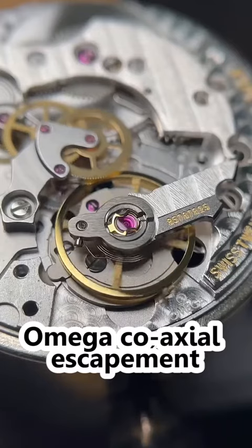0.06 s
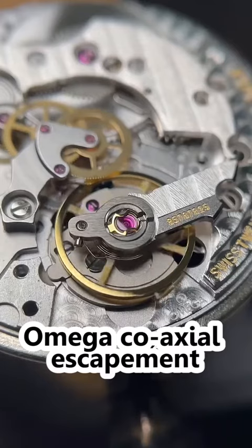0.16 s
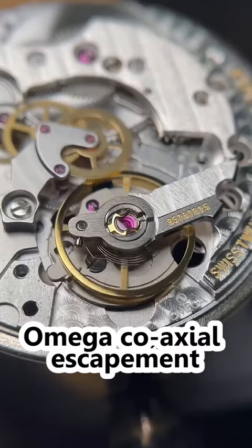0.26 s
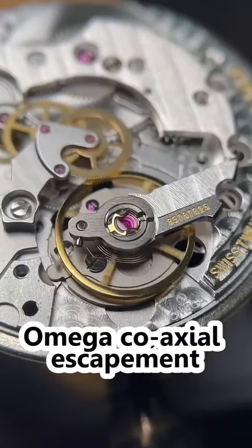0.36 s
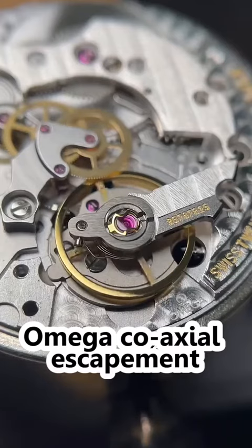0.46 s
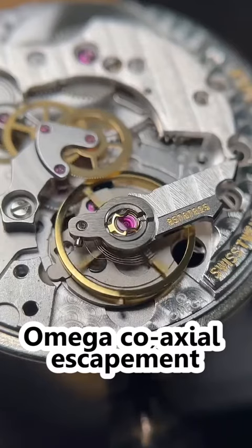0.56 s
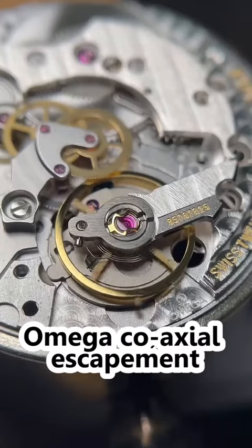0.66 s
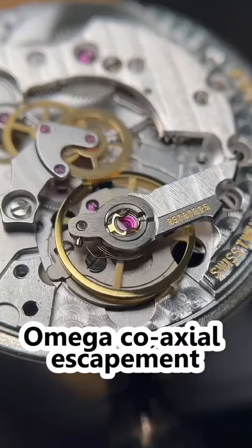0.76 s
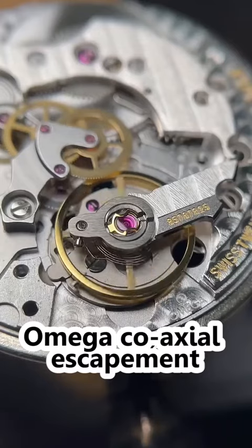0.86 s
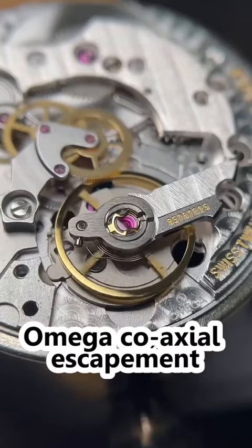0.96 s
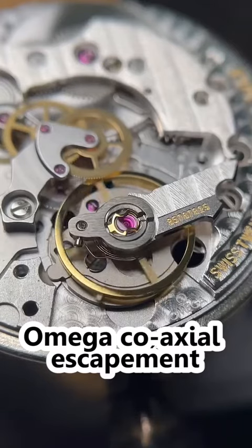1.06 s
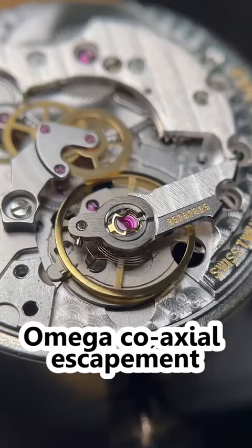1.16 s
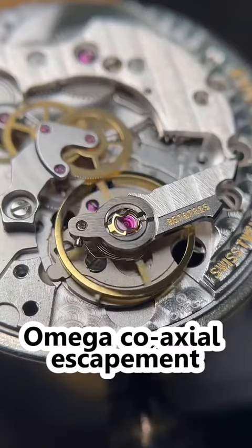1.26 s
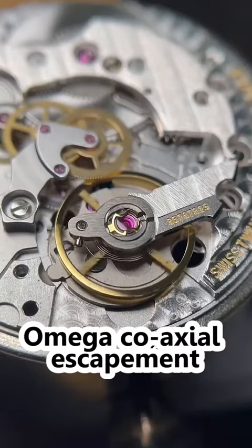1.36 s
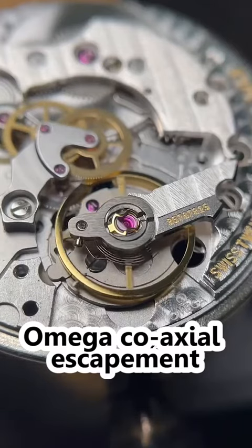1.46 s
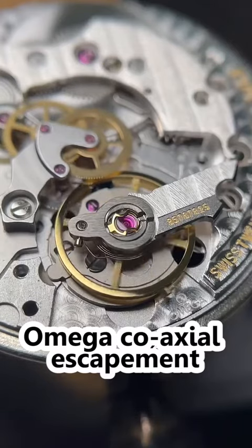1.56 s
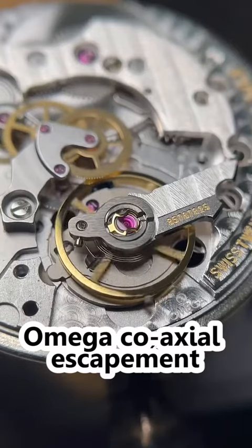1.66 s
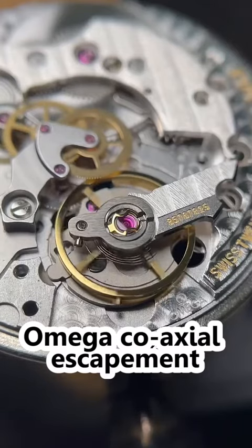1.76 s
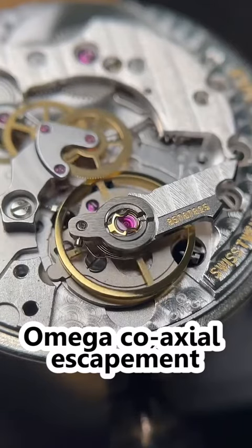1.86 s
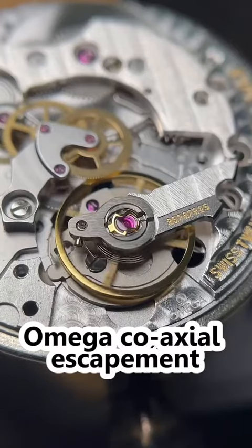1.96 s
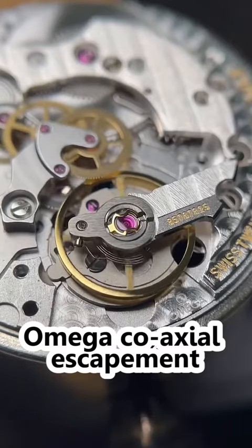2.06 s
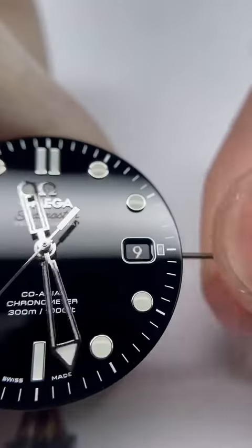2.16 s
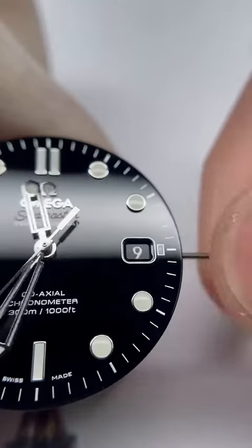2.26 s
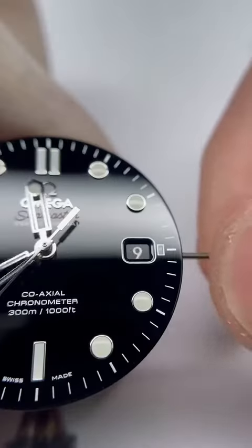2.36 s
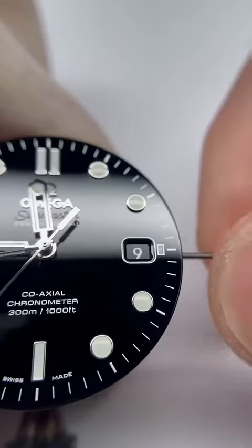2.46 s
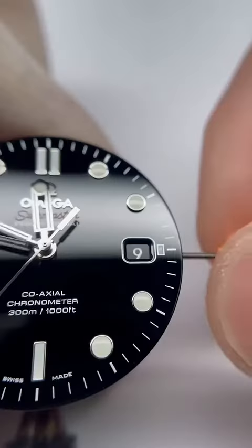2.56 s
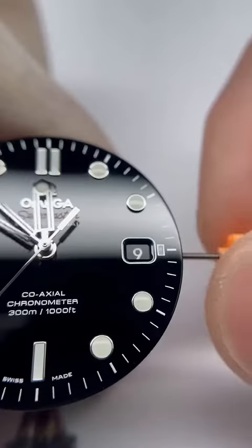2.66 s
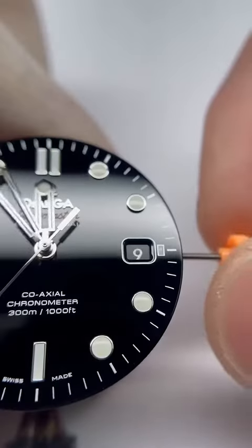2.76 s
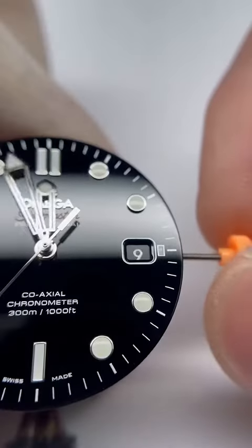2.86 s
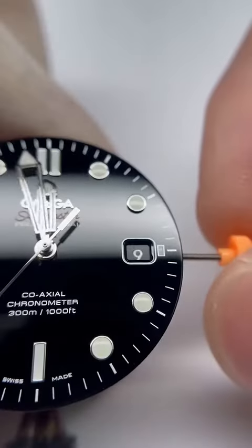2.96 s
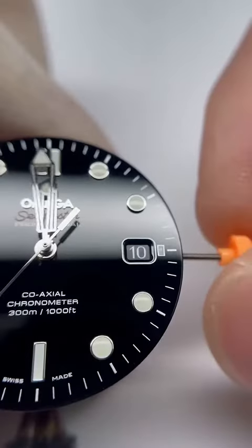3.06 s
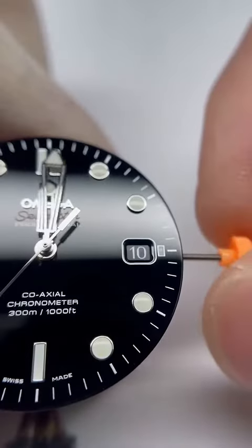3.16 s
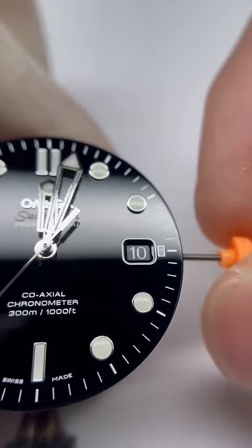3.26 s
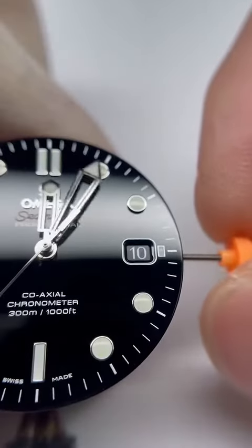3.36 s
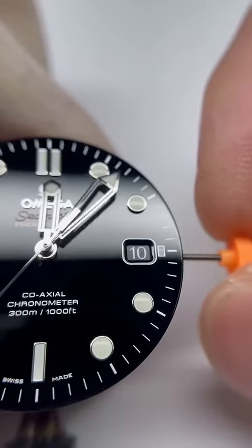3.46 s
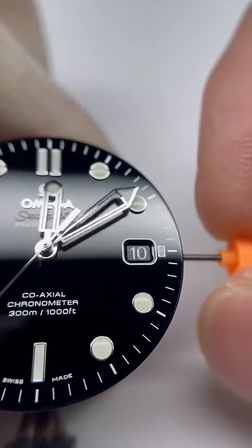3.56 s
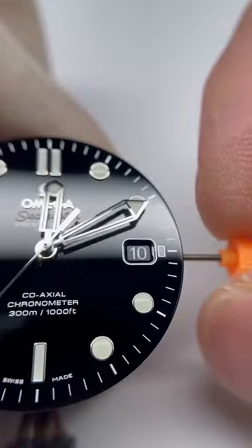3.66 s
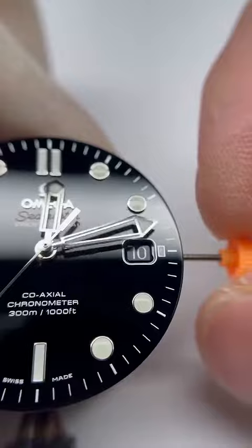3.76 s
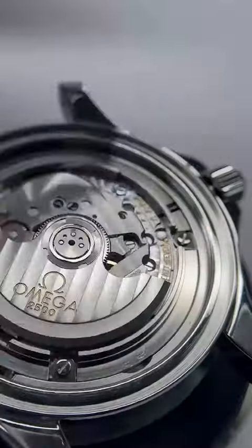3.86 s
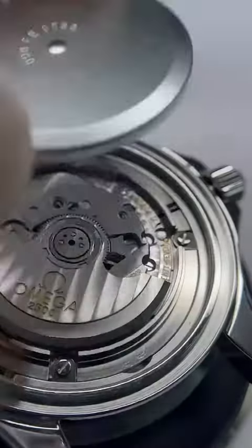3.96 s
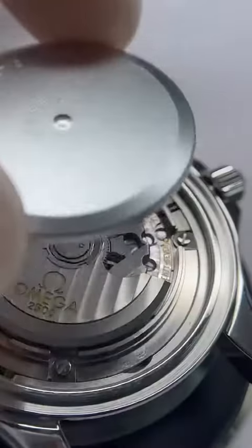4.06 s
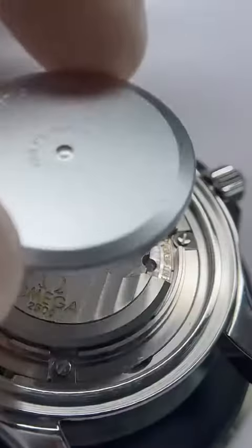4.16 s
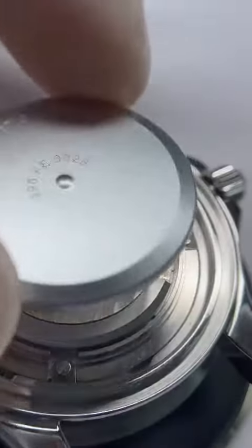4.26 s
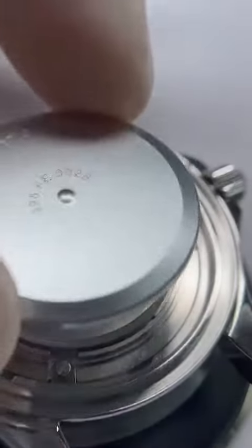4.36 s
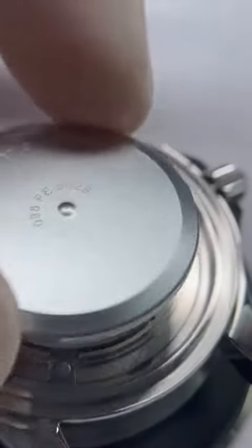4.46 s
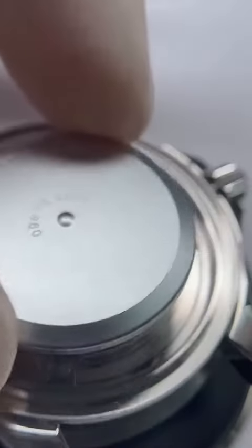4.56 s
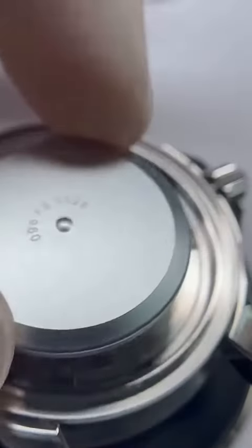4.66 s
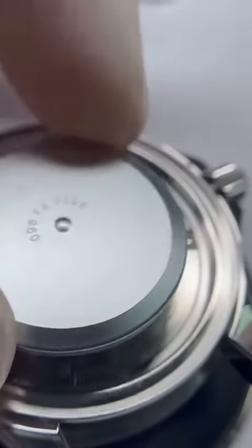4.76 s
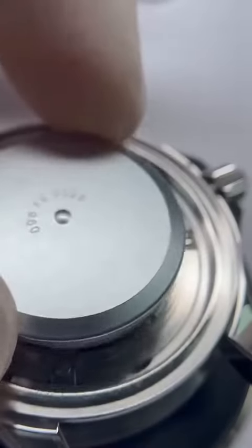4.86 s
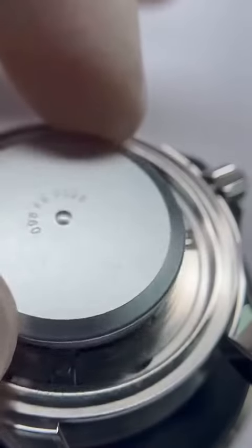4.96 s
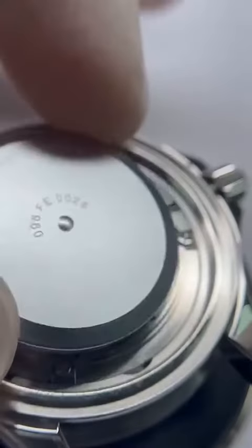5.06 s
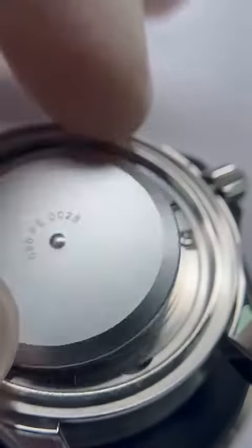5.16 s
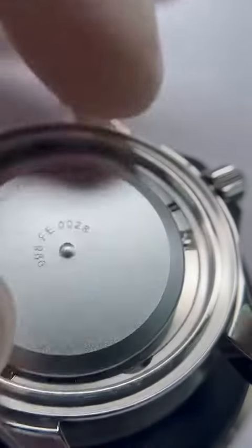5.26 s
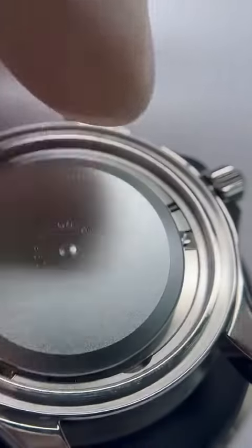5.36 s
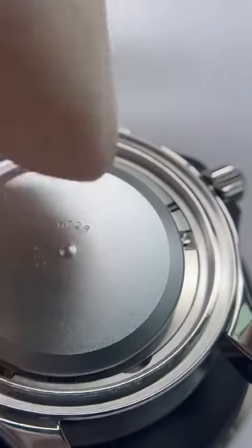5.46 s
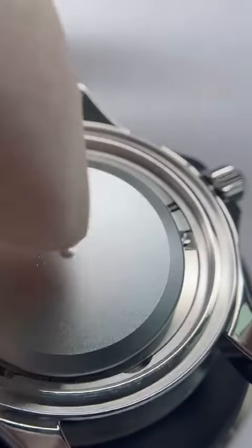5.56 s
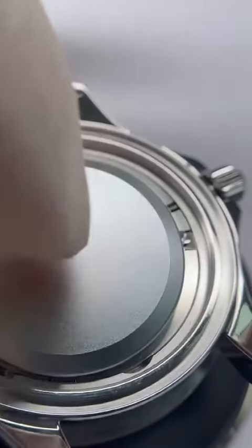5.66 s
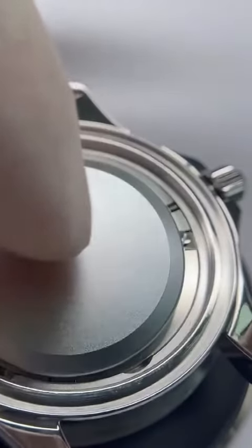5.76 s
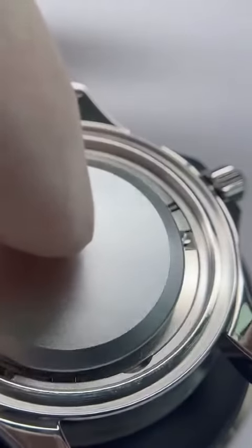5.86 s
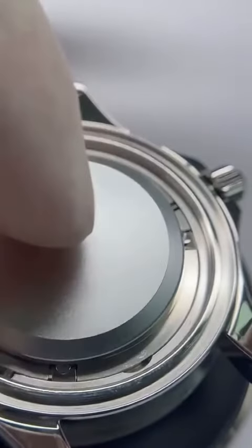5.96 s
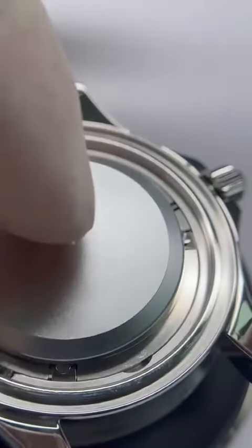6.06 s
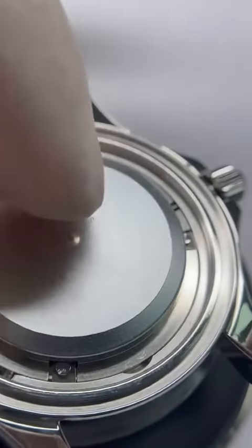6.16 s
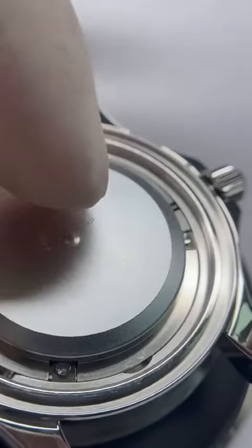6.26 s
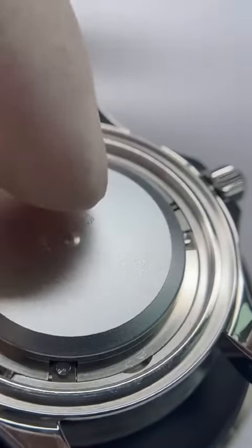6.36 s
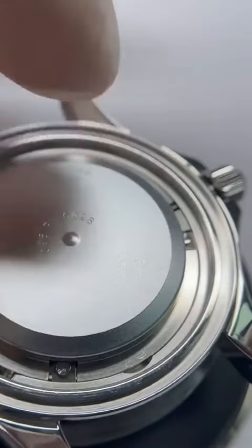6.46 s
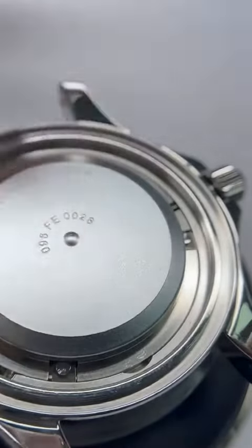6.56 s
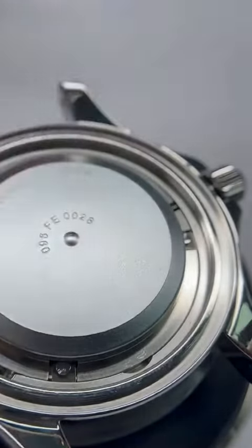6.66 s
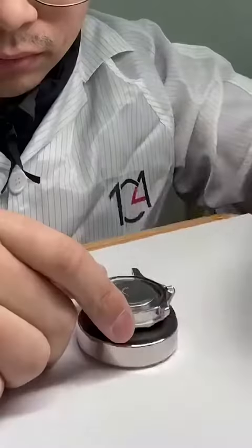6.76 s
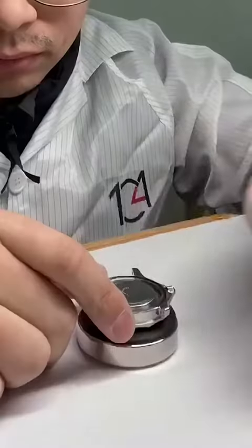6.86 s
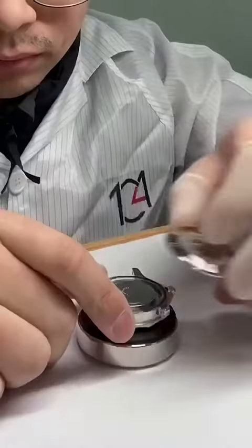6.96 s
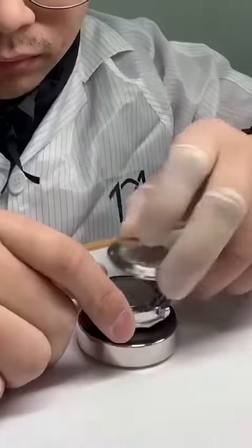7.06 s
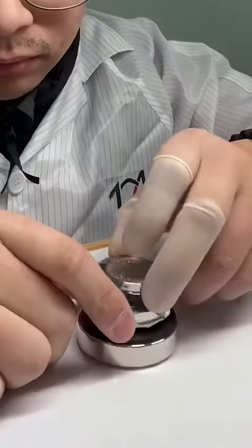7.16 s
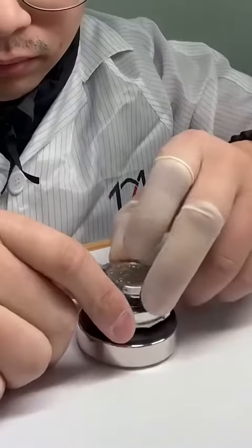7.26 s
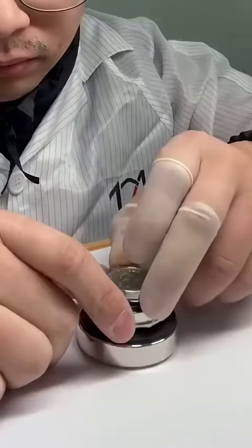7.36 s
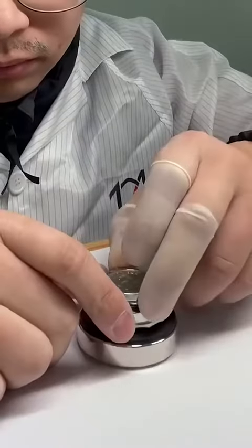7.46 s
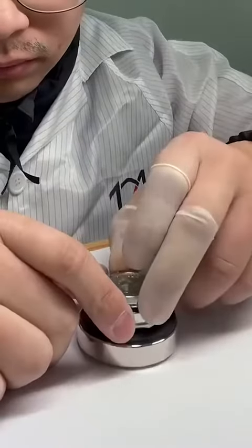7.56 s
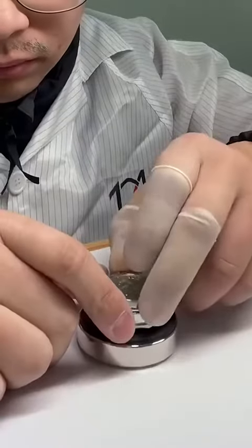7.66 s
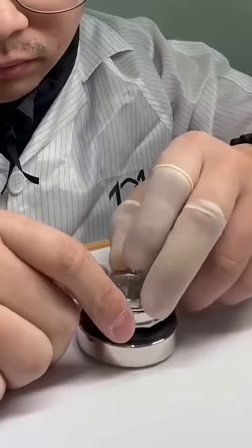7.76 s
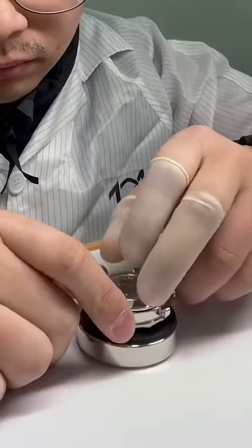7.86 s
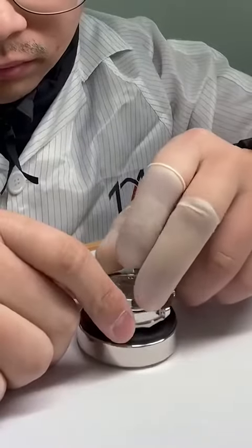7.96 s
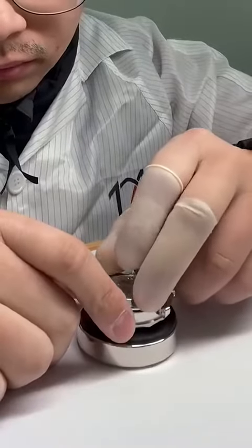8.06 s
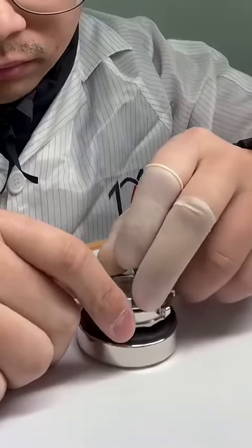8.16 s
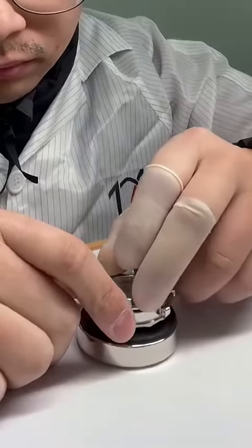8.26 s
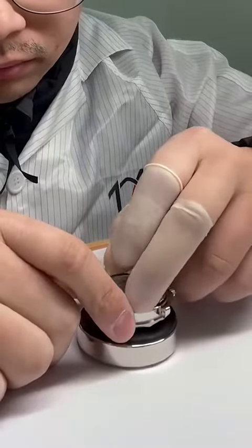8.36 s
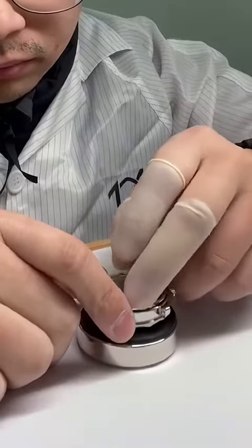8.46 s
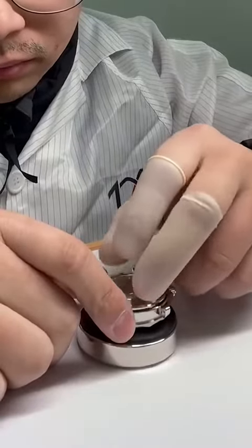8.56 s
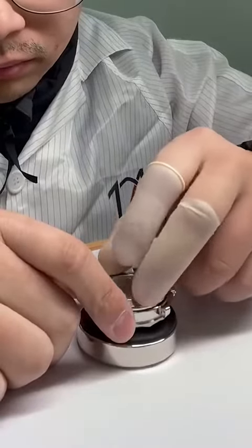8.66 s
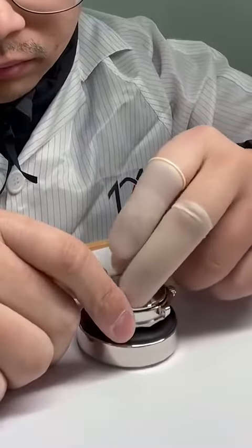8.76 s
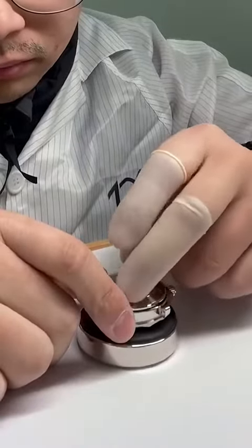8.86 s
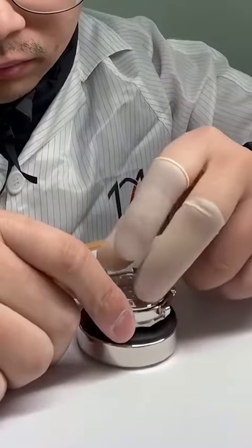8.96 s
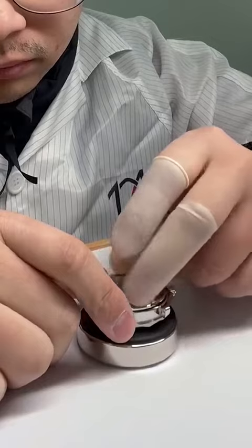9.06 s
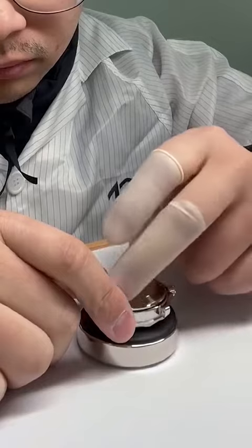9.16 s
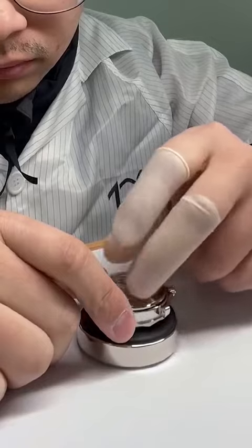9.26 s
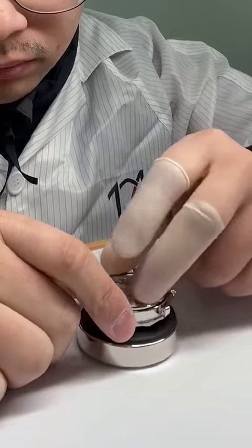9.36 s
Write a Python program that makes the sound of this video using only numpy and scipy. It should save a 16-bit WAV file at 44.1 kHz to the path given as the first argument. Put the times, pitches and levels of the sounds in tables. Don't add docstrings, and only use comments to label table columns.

```python
import sys
import numpy as np
from scipy import signal
from scipy.fft import rfft, irfft, next_fast_len
from scipy.io import wavfile
from scipy.ndimage import uniform_filter1d

SR = 44100
rng = np.random.default_rng(int(sys.argv[2]) if len(sys.argv) > 2 else 0)


def convert_level_to_amplitude(level_db):
    exponent = np.asarray(level_db, float) / 20
    return 10 ** exponent


def wav_out(sig):
    wavfile.write(sys.argv[1], SR, np.round(np.clip(np.atleast_2d(sig).T, -1, 1) * 32767).astype(np.int16))


N = 415863
TIME = np.arange(N) / SR

SCENES_S = [0, 1.652, 3.347, 6.143, 9.44]
# frequency in Hz, density in dB per Hz.
ROOMS = [
    [(12, -43), (20, 13.5), (58, -36), (146, -9), (198, -9.5), (718, -13), (849, -14.5), (1030, -13),
     (2390, -23), (2670, -19.5), (3340, -20.5), (4670, -22), (6720, -31.5), (9670, -24.5), (16000, -36)],
    [(12, -7.5), (20, 0), (39, -8.5), (96, -21.5), (347, -15), (642, -22.5), (738, -19.5), (3740, -45.5),
     (4300, -47), (5080, -47), (8180, -51.5), (13900, -50), (16000, -55)],
    [(12, -40), (20, 2.5), (50, -19), (77, -25.5), (241, -28), (459, -34.5), (678, -33), (1330, -36.5),
     (2600, -45), (3160, -44.5), (6720, -49), (12800, -50.5), (16000, -53.5)],
    [(12, -28), (20, -7.5), (48, 13), (107, -45.5), (130, -5.5), (248, -6.5), (558, -11.5), (825, -12),
     (1060, -13), (1260, -13), (2020, -16), (2200, -21.5), (16000, -34)],
]
ROOMS_DB = [-57.5, -49, -52.5, -56.5]
# multiple of the mains, level in dB rms.
HUMS = [
    [(2, -64), (4, -70.5), (6, -75), (7, -75), (16, -77), (17, -72), (19, -71.5), (23, -79), (25, -74),
     (29, -87), (35, -75.5)],
    [],
    [(14, -82.5), (65, -83.5)],
    [(2, -67), (5, -84), (7, -76), (13, -76.5), (16, -75.5), (17, -71), (19, -71.5), (23, -81), (25, -72),
     (29, -78)],
]
MOTOR_DB = [-56, -66, -82.5, -64]

# time in seconds, level in dB, treble in dB.
SLEEVE = [
    (6.166, -78, 1),
    (6.35, -57.5, -14),
    (6.524, -56.5, -11),
    (6.556, -52.5, -14),
    (6.61, -68, -6),
]
# start and length in seconds, first and last level in dB, treble in dB.
HAND = [
    (3.36, 0.33, -61, -82, -6),
]

# peak, lows, low mids, highs and top, all in dB.
BEATS = [(-26.5, -17, 0, -17, -23), (-28.5, -11, -19, -13.5, -22), (-25.5, -18.5, -3, -10, -29),
         (-24.5, -26, 2, -13, -31), (-25.5, -18, -26, -11.5, -26), (-28, -22, -5, -13, -22),
         (-24.5, -22, -13, -16, -22), (-28.5, -12, -3, -8, -25), (-28.5, -19.5, 0, -16, -23),
         (-25, -18, -16, -14.5, -26), (-28, -15.5, -2, -12.5, -23), (-29.5, -23, -1, -12, -23)]
# Lows, highs and top in dB, then contact length in ms, of a beat heard from farther off.
FAR_COLOUR = (-10.5, -9.5, 3.5, 6)
BEAT_S, BEAT_ERROR_S = .14286, .0015
# frequency in Hz, width in Hz, level in dB.
MOVEMENT = [(1524, 398, 6), (3010, 160, -14), (3740, 172, -5), (4640, 400, -3.5), (4966, 610, -5),
            (9130, 200, 10), (9400, 1040, 6), (10680, 852, 7), (12800, 2230, 0.5)]
# start in seconds, Hz, peak in dB, t60 in seconds.
BALANCE_RING = [(.072, 9130, -53, 0.33), (.212, 9130, -56, 0.14), (.352, 9130, -46, 0.2),
                (.358, 11870, -52, 0.18), (.497, 11870, -58, 0.2), (1.217, 9130, -62, 0.1)]

# start in seconds, peak, lows, highs and top in dB, contact length in ms.
DATE = [
    (2.553, -10, 0.5, -7, -10, 2.3),
    (2.563, -33, -19, 8, 2, 4.4),
]
# frequency in Hz, width in Hz, level in dB.
DIAL = [(1260, 150, -16.5), (1810, 410, -19), (2350, 690, -5.5), (3340, 330, -28), (4400, 730, -9.5),
        (6320, 380, -5.5), (8050, 460, 2), (9970, 670, -4), (11330, 740, -5), (13900, 2300, -5.5)]
# start in seconds, Hz, peak in dB, t60 in seconds.
THUMPS = [(2.554, 234, -10.5, 0.022), (2.690, 145, -36, 0.04), (3.363, 30, -42, 0.3),
          (4.648, 92, -34, 0.058), (4.648, 200, -33, 0.035), (4.535, 91, -40.5, 0.041),
          (5.62, 170, -46.5, .08), (9.097, 595, -33.5, 0.025), (8.0825, 980, -29, 0.013),
          (7.103, 930, -33, 0.058), (8.083, 310, -33, 0.027), (3.46, 25, -49, 0.66), (3.54, 26, -51, .5),
          (5.99, 32, -49, 0.44)]

# start in seconds, crack peak in dB, main ring in dB,
# rim brightness in dB, time until choked in ms.
SEATING = [(4.534, -9, -15.5, -0.5, 10), (4.549, -27, -24, 2.5, 14), (4.558, -28.5, -27.5, 1.3, 9.7),
           (4.634, -13, -17, -6.5, 39), (4.647, -5.5, -5, 4, 7.9), (4.653, -7.5, -22, 15.5, 8.5),
           (4.660, -6.5, -19, 12, 10), (4.668, -25, -21.5, -5, 7.9), (4.674, -13.5, -15, 0.5, 10),
           (4.687, -10.5, -13, -4, 17), (4.698, -15, -17, 0.5, 5), (4.703, -11.5, -9, -1.5, 17),
           (4.7239, -12, -10, -2.5, 10), (4.7368, -19.5, -10.5, -4, 7.9), (4.752, -20, -18, -6.5, 8.7),
           (4.761, -25, -25, -5, 4.9)]
PRESSING = [(5.321, -20.5, -22.5, -7, 2.3), (5.333, -29, -33, -8, 7.7), (5.346, -47, -33, -6, 4.6),
            (5.355, -39, -31, -1, 4.7), (5.36, -39, -34, -1, 5.8), (5.379, -13, -15, -3.5, 1.4),
            (5.401, -30.5, -34, -3, 6.1), (5.61, -25.5, -26, -18, 5.1), (5.616, -17, -11, -10.5, 11),
            (5.636, -9.5, -10.5, 20, 3.5), (5.644, -15, -22, 26, 7.7), (5.652, -19, -26, 18, 3.2)]
COVER_TOP_DB = [-6, -6, -8, -16.5, -6.5, -14, -15.5, -8.5, -8, -3, -2.5, -8.5, -8.5, -5, -8, -8.5, -9,
                -16.5, -14, 0, -9, -1, -14, -29, -24, -6, -9.5, -4]
# frequency in Hz, width in Hz, level in dB.
COVER_BODY = [(2700, 250, -15.5), (4150, 73, -11.5), (5640, 150, -9), (6140, 300, -5.5), (7195, 200, -5),
              (7990, 180, -6), (7360, 50, -5), (8266, 140, -0.5), (9800, 210, -9.5), (11300, 280, -2),
              (13900, 160, -19)]
PRESSED_BODY = [(2730, 200, -15), (4200, 90, -10), (6260, 200, -9), (7220, 150, -1.5), (7600, 120, -2.5),
                (7860, 110, -3.5), (9580, 300, -12), (13000, 400, -7), (13800, 250, -16)]
# frequency in Hz, level in dB.
COVER_PAIR = [(4264, -14), (4303, -0.5), (4090, -14.5), (4405, -15.5)]
# frequency in Hz, level in dB, t60 in seconds.
COVER_RING = [(4070, -16.5, 0.33), (4156, -20.5, .6), (4247, -8, .5), (4337, -8, .55), (4409, -12, .25),
              (7050, -7.5, .35), (7240, -4, .4), (7470, -4, .35), (7596, 0, .3), (7800, -6, 0.33),
              (7940, -5, .3), (9814, -8.5, .4), (11300, -4.5, .25), (13950, -7, .3)]
# start in seconds, Hz, peak in dB, t60 in seconds.
COVER_PINGS = [(4.535, 11300, -34, .14), (4.648, 11390, -26, .08), (4.688, 11250, -25, .07),
               (4.688, 5650, -26, .03), (4.724, 5670, -27, .03), (5.321, 6200, -34, 0.035),
               (5.35, 6270, -44, .08), (5.38, 7250, -43, 0.099), (5.38, 13900, -40, .06),
               (4.656, 8330, -14.5, .06), (4.66, 7940, -17, .045)]
# time in seconds, gain in dB.
COVER_FREEDOM = [(4.5, 3), (4.62, -3.5), (5.2, -6.5), (5.3, -7), (5.37, -14), (5.5, -20), (5.6, -14)]
# start and length in seconds, first and last level in dB, treble in dB.
CHATTER = [(4.54, 0.089, -29.5, -72, 7), (4.646, 0.022, -28.5, -28.5, 13), (4.67, 0.084, -35, -41, 10.5),
           (4.754, 0.051, -46, -69.5, 6), (5.335, 0.037, -55, -45.5, 1), (5.396, 0.039, -37, -77, -4),
           (5.611, 0.036, -32, -30, -1.5), (5.64, 0.025, -18, -56.5, -12), (5.655, 0.035, -53, -57, 7)]

# start in seconds, peak in dB, lows in dB,
# contact length in ms.
CLICKS = [(6.998, -8, -24.5, 3.1), (7.102, -5.5, -19.5, 4.8), (7.124, -24.5, -12, 4.7),
          (7.149, -25, -19, 2.7), (7.155, -22.5, -15, 2.3), (7.445, -29, -22, 2.8),
          (7.449, -12, -19.5, 4.7), (7.595, -21, -23, 9.2), (7.601, -14.5, -22, 2.5),
          (7.615, -22, -20, 2.6), (7.814, -38, -23, 3.9), (7.836, -27, -17.5, 6.6), (7.896, -38, -15, 2.5),
          (8.049, -20, -15, 6.4), (8.055, -6.5, -19, 3), (8.082, -2, -7.5, 1.6), (8.097, -15, -22, 0.94),
          (8.203, -15.5, -14.5, 2), (8.413, -5, -24.5, 0.36), (8.55, -34, -18, 2.1), (8.578, -30, -10, 1.9),
          (8.748, -13.5, -18, 2), (8.803, -23.5, -29, 1.1), (8.864, -16.5, -21.5, 2.5),
          (8.913, -22, -31, 0.76), (9.096, -15, -25.5, 2.7), (9.141, -24.5, -43, 2.1),
          (9.165, -30, -26, 2.5), (9.2, -30, -7, 1.6), (9.228, -15.5, -15.5, 0.7), (9.409, -24, -22, 2.2),
          (7.928, -39, -16, 2.1),
]
# highs in dB at full scale, dB per dB, top in dB at full scale,
# dB per dB, dB per ms of contact.
CLICK_BRIGHT = (-6.5, 1.02, -7, 0.39, -0.1)
# highs in dB, top in dB.
CLICK_TINT = [(6.5, 10.5), (-2, 4.5), (-3, -9), (0, -2.5), (-2.5, -6), (-1, -1.5), (1, -0.5), (-4.5, -13),
              (2, -8), (-1, -8), (0, 0), (-0.5, -8), (12, 4), (5, 0), (-4, -5), (-6, 1), (-5, 6.5), (-8, 5),
              (6, -2), (-0.5, 9), (17, .6), (12, -13), (2.5, 0), (7, -4), (3.5, 0), (-10, -11), (2.5, 0),
              (2, -7), (15, 4), (15, .6), (4.5, 0.5), (4.5, 0.5)]
# frequency in Hz, width in Hz, level in dB.
CASE = [(1102, 215, -13.5), (1486, 143, -5.5), (2266, 360, -2.5), (4245, 590, -1.5), (6900, 880, -13),
        (7540, 140, 1), (7950, 1520, -7), (10120, 130, -2.5), (11900, 320, -11), (12025, 640, 7),
        (12700, 730, 2)]
BITTEN_CASE = [(1050, 250, -10), (1483, 200, -5), (2266, 500, -10), (4500, 600, 2), (7800, 870, 3),
               (9200, 1500, 4), (12400, 900, -5)]
# frequency in Hz, level in dB, t60 in seconds.
CASE_RING = [(2290, -3, .4), (2100, -15, .2), (4500, -8, 0.14), (6780, -11, .2), (7270, 2, .2),
             (8250, -6, .15), (11780, -6, .15), (12340, 2, .3)]
# time in seconds, gain in dB.
CASE_FREEDOM = [(6.99, 6), (7.09, -2), (7.4, -9), (7.62, -8), (8.04, 3), (8.09, -14), (8.19, 2),
                (8.41, -18), (8.75, -8), (9.4, -5)]
# start in seconds, Hz, peak in dB, t60 in seconds.
CASE_KNOCKS = [(6.9985, 2440, -23.5, 0.026), (6.9985, 2130, -28, .025), (6.9985, 4490, -26, 0.037),
               (7.1025, 2290, -22.5, 0.036), (7.1025, 4520, -24.5, 0.032), (7.1035, 6780, -22, .04),
               (7.11, 2300, -51, 0.44), (8.8, 624, -34, 0.028), (8.4135, 2480, -20.5, 0.013),
               (8.804, 4570, -29, 0.013), (9.097, 4540, -26, .02), (6.999, 14000, -38, .09),
               (9.097, 2040, -33, .03), (8.749, 370, -38.5, 0.019), (8.578, 1000, -35, .025),
               (9.228, 1040, -34, .025), (9.165, 5100, -35, .02)]
# start and length in seconds, first and last level in dB, treble in dB.
GRINDING = [(7.004, 0.083, -48, -69, 9), (7.115, 0.064, -56, -55, -17), (7.165, 0.18, -58, -70, -13),
            (7.615, 0.11, -58, -60, -11), (8.1, 0.029, -32, -72, -10), (8.124, .06, -57, -59, -12),
            (8.188, 0.11, -39.5, -74, -14), (8.058, .024, -50, -49, 7), (8.085, .016, -46, -48, 8),
            (8.19, 0.023, -61, -60, 9), (8.762, 0.038, -57, -54, -9), (8.81, 0.059, -51.5, -48, -5),
            (8.875, 0.077, -44.5, -65, -13)]
BITING = [(8.422, 0.074, -60, -55, -11), (8.486, .095, -50, -52.5, -7.5), (9.105, 0.065, -49, -45.5, -6.5),
          (9.159, 0.068, -44.5, -50, -6.5), (9.232, 0.028, -50, -59, -7)]


def on_log(hz, points_hz, values):
    return np.interp(np.log(hz + 1), np.log(points_hz), values)


def body(hz, peaks, between_db):
    response = convert_level_to_amplitude(between_db)
    for k, (f, width, db) in enumerate(peaks):
        damping = 1j * hz * width
        response = response + (-1) ** k * convert_level_to_amplitude(db) * damping / (f * f - hz * hz + damping)
    return response


def blows(events, peaks, edges_hz, between_db, spike, rise_ms, shift=.01, hold_ms=160.0,
          lead_ms=0., lead_db=-62.0, lead_width_ms=.48):
    size, bass_loss_db = 8192, 18
    out = np.zeros(N + size)
    after_ms = np.arange(size) / SR * 1000 - 20
    hz = np.fft.rfftfreq(size, 1 / SR)
    gaps_ms = np.append(np.diff([e[0] for e in events]) * 1000, hold_ms)
    chances = rng.standard_normal((len(events), size))
    for (s, peak_db, low_db, high_db, top_db, ms), gap_ms, chance in zip(events, gaps_ms, chances):
        rise = (1 - np.exp(-np.abs(after_ms) / rise_ms)) ** 2
        push = np.where(after_ms > 0, rise * np.exp(-np.abs(after_ms) / abs(ms)), 0)
        lead = convert_level_to_amplitude(lead_db) * np.exp(-((after_ms + lead_ms) / lead_width_ms) ** 2)
        push = push / push.max() + lead
        part = body(hz * (1 + shift * chance[0]), peaks, between_db)
        cluster = rfft(push * chance * np.minimum(np.abs(chance), 2.4) ** spike)
        cluster = cluster / np.sqrt(uniform_filter1d(np.abs(cluster) ** 2, size=100))
        colour_db = on_log(hz, edges_hz, [low_db - bass_loss_db, low_db, 0, high_db, top_db])
        hit = irfft(cluster * part * convert_level_to_amplitude(colour_db))
        hit = hit * np.exp(-np.clip(after_ms - min(gap_ms, hold_ms), 0, None) / 2.86)
        start = max(int((s - .02) * SR), 0)
        out[start:start + size] += hit * convert_level_to_amplitude(peak_db) / np.abs(hit).max()
    return out[:N]


def ring(x, modes, db):
    out = 0
    for hz, mode_db, t60 in modes:
        pole = np.exp(2j * np.pi * hz / SR - np.log(1000) / (min(t60, 1.2) * SR))
        out = out + convert_level_to_amplitude(mode_db) * signal.lfilter([1], [1, -pole], x).imag
    return out * convert_level_to_amplitude(db)


def tones(rows, rise_ms, holds_ms=None, choke_ms=2.5):
    out = np.zeros(N + SR)
    t = np.arange(SR // 4) / SR
    turns = rng.random((len(rows), 1))
    for k, ((s, hz, db, t60), turn) in enumerate(zip(rows, turns)):
        shape = (1 - np.exp(-t * 1000 / rise_ms)) * np.exp(-np.log(1000) * t / t60)
        if holds_ms is not None:
            shape = shape * np.exp(-np.clip(t * 1000 - holds_ms[k], 0, None) / choke_ms)
        start = int(s * SR)
        out[start:start + len(t)] += convert_level_to_amplitude(db) * shape * np.sin(2 * np.pi * (hz * t + turn / 2))
    return out[:N]


def band(x, lo_hz, hi_hz):
    y = signal.sosfilt(signal.butter(2, [lo_hz, hi_hz], "band", fs=SR, output="sos"), x)
    return y / y.std()


def strokes(rows):
    return [[(s, start_db, treble_db), (s + length, end_db, treble_db)]
            for s, length, start_db, end_db, treble_db in rows]


def rubbing(tables, peaks, between_db, grain_db, split_hz):
    grain = np.minimum(rng.exponential(size=N // 32 + 1), 4)
    grit = rng.standard_normal(N) * convert_level_to_amplitude(grain_db * np.repeat(grain, 32)[:N])
    size = next_fast_len(N)
    response = body(np.fft.rfftfreq(size, 1 / SR), peaks, between_db)
    grit = irfft(rfft(grit, size) * response, size)[:N]
    low, high = band(grit, 410, split_hz), band(grit, split_hz, 14000)
    out = np.zeros(N)
    for table in tables:
        s, db, treble_db = np.transpose(table)
        span = slice(int(s[0] * SR), int(s[-1] * SR))
        t = TIME[span]
        edge = np.clip(np.minimum(t - s[0], s[-1] - t) / .006, 0, 1)
        treble = high[span] * convert_level_to_amplitude(np.interp(t, s, treble_db))
        out[span] += edge * convert_level_to_amplitude(np.interp(t, s, db)) * (low[span] + treble)
    return out


def bench_echo(x, db, t60_s, top_hz, low_hz=300):
    t = np.arange(SR // 2) / SR
    decay = np.exp(-np.log(1000) * t / t60_s) * (t > .004)
    tail = band(rng.standard_normal(len(t)), low_hz, top_hz) * decay
    return convert_level_to_amplitude(db) * signal.fftconvolve(x, tail / np.sqrt(np.sum(tail ** 2)))[:N]


def room_tone():
    mains_hz = 49.65
    size = next_fast_len(N)
    out, hz = np.zeros(N), np.fft.rfftfreq(size, 1 / SR)
    swell = convert_level_to_amplitude(1.1 * band(rng.standard_normal(N), 1.5, 9))
    motor = band(rng.standard_normal(N), 38, 60)
    scenes = zip(SCENES_S, SCENES_S[1:], ROOMS, ROOMS_DB, HUMS, MOTOR_DB)
    for start, end, room, db, hum, motor_db in scenes:
        colour = convert_level_to_amplitude(on_log(hz, *np.transpose(room)))
        air = irfft(rfft(rng.standard_normal(N), size) * colour, size)[:N]
        span = slice(int(start * SR), int(end * SR))
        tone = (air / air.std() * convert_level_to_amplitude(db) * swell + convert_level_to_amplitude(motor_db) * motor)[span]
        for order, line_db in hum:
            turns = round(order) * mains_hz * TIME[span] + rng.random()
            tone = tone + np.sqrt(2) * convert_level_to_amplitude(line_db) * np.sin(2 * np.pi * turns)
        out[span] += tone
    return out


def offset_step():
    return -convert_level_to_amplitude(-43.5) * (TIME >= 3.3555) * (TIME < 3.3628)


def gear_train():
    centre_hz, width_hz = 4750, 560
    whirr = band(rng.standard_normal(N), centre_hz - width_hz / 2, centre_hz + width_hz / 2)
    return convert_level_to_amplitude(-67.5) * whirr * (TIME < SCENES_S[1])


def sleeve_and_hand():
    bench = [(1586, 220, 1.3), (3280, 1700, 4.8)]  # Hz, width Hz, dB
    return rubbing([SLEEVE, *strokes(HAND)], bench, 0, 1.7, 5300)


def beat_start(first_s, k):
    return first_s + k * BEAT_S - k % 2 * BEAT_ERROR_S


def far_escapement():
    peaks_db = -54.5 + 2.5 * rng.standard_normal(size=13)
    rows = []
    for k, (db, c) in enumerate(zip(peaks_db, rng.standard_normal((13, 4)))):
        colour_db = np.add(FAR_COLOUR[:3], 3 * c[:3])
        rows.append((beat_start(3.42, k), db, *colour_db, FAR_COLOUR[3] * np.exp(.3 * c[3])))
    return blows(rows, MOVEMENT, [2010, 5000, 8010, 9990, 13070], -13, 0.27, 1.5)


def escapement():
    edges_hz = [600, 1700, 4500, 9000, 13000]
    rows = [(beat_start(.07, k), db, low_db, high_db, top_db, 3.66)
            for k, (db, low_db, _, high_db, top_db) in enumerate(BEATS)]
    lever = blows(rows, MOVEMENT, edges_hz, -36.0, 0.64, 0.34, shift=0.039,
                  lead_ms=3.6, lead_db=-17, lead_width_ms=2.9)
    bridge_rows = [(s, db + beat[2], -20, -20, -40, ms) for (s, db, *_, ms), beat in zip(rows, BEATS)]
    bridge = blows(bridge_rows, [(2970, 500, 0)], [600, 1500, 2750, 5000, 9000], -36.0, 0.7, 0.23, shift=.025)
    lock_rows = [(s + .0086, db - 16.5, low_db + 5.0, high_db + 22.0, top_db + 18.0, 3.5)
                 for s, db, low_db, high_db, top_db, _ in rows]
    lock = blows(lock_rows, MOVEMENT, edges_hz, -28.0, 1.0, 2.0, shift=0.016)
    near = lever + convert_level_to_amplitude(-11.5) * bridge + lock
    near = near + tones(BALANCE_RING, 1.3) + bench_echo(near, -19.0, 0.26, 11000)
    return near * (TIME < SCENES_S[1])


def date_jump():
    snap = blows(DATE, DIAL, [60, 600, 2500, 8000, 13000], -24.0, 0.76, 1.23, shift=.002, hold_ms=11.0)
    return snap + tones(THUMPS, 1.7) + bench_echo(snap, -33.0, 0.61, 5000, low_hz=1500)


def cover_cracks(rocking):
    rows = [(s, db, -12, rim_db, top_db, 2.2)
            for (s, db, _, rim_db, _), top_db in zip(rocking, COVER_TOP_DB)]
    seated = len(SEATING)
    out = 0
    for part, peaks in ((rows[:seated], COVER_BODY), (rows[seated:], PRESSED_BODY)):
        out = out + blows(part, peaks, [200, 1500, 4300, 7500, 12000], -10.5, 1.9, 0.77, shift=0.00207,
                          hold_ms=35.0, lead_db=-19.5, lead_width_ms=3.6)
    return out


def cover_main_ring(rocking):
    rows, holds_ms = [], []
    for s, _, ring_db, _, choked_ms in rocking:
        pitch = .955 if 5.37 < s < 5.5 else 1
        for hz, mode_db in COVER_PAIR:
            rows.append((s, hz * pitch, ring_db + mode_db + 0.3, .13))
            holds_ms.append(choked_ms)
    return tones(rows, 0.99, holds_ms, choke_ms=2.2)


def cover():
    rocking = list(SEATING) + list(PRESSING)
    gaps_db = -19
    knocks = cover_cracks(rocking) + cover_main_ring(rocking)
    knocks = knocks + rubbing(strokes(CHATTER[:4]), COVER_BODY, gaps_db, 3.0, 4100)
    knocks = knocks + rubbing(strokes(CHATTER[4:]), PRESSED_BODY, gaps_db, 3.8, 4100)
    loose = knocks * convert_level_to_amplitude(np.interp(TIME, *np.transpose(COVER_FREEDOM)))
    free = ring(loose, COVER_RING, -85.5)
    free = free + bench_echo(loose, -22.5, 0.27, 8050, low_hz=6970)
    free = free + bench_echo(loose, -36.5, 0.7, 4486, low_hz=4080)
    holder_rows = [(s, db - 26.0 - 0.55 * rim_db, -4, -8, -30, 3.5) for s, db, _, rim_db, _ in rocking]
    holder = blows(holder_rows, [(560, 110, -1.642), (1410, 1400, 0.21)],
                   [120, 350, 900, 2000, 5000], -10.0, 0.88, 1.0)
    return knocks + free + holder + tones(COVER_PINGS, 1.2) + bench_echo(knocks, -27.5, 0.34, 8100)


def by_force(rows, bright):
    highs_db, highs_slope, top_db, top_slope, per_ms = bright
    return [(s, db, low_db, highs_db + highs_slope * db + per_ms * ms / 2,
             top_db + top_slope * db + per_ms * ms, ms) for s, db, low_db, ms in rows]


def case_back():
    rows = by_force(sorted([tuple(row) for row in CLICKS]), CLICK_BRIGHT)
    rows = np.add(rows, [0, -3.5, 29.5, 17.0, 4.5, 0.7])
    rows[:, 3:5] += CLICK_TINT
    clicks = blows(rows, CASE, [250, 900, 3000, 7500, 12000], -17.5, 1.07, 0.62, shift=.012,
                   lead_ms=0.79, lead_db=-10.5, lead_width_ms=0.5)
    clicks = clicks + rubbing(strokes(GRINDING), CASE, -3, 3.2, 3600)
    clicks = clicks + rubbing(strokes(BITING), BITTEN_CASE, -9.0, 3.6, 3760)
    clicks = clicks + tones(CASE_KNOCKS, 0.12)
    loose = clicks * convert_level_to_amplitude(np.interp(TIME, *np.transpose(CASE_FREEDOM)))
    shimmer = bench_echo(loose, -19.0, 0.052, 13100, low_hz=11600)
    shimmer = shimmer + bench_echo(loose, -19.0, 0.061, 7600, low_hz=6770)
    return clicks + ring(loose, CASE_RING, -68.5) + shimmer + bench_echo(clicks, -22.5, 0.56, 7100)


def scene():
    background = room_tone() + offset_step() + gear_train() + sleeve_and_hand()
    watch = far_escapement() + escapement() + date_jump() + cover() + case_back()
    return (background + watch)[None]


def band_limit(x):
    return signal.sosfilt(signal.butter(12, 16430, fs=SR, output="sos"), x)


def record(dry):
    top_cut = signal.ellip(10, .2, 60, 15800, fs=SR, output="sos")
    mix = signal.sosfilt(top_cut, np.clip(dry, -1, 1))
    return band_limit(mix)


dry = scene()
out = record(dry)
wav_out(out)
```